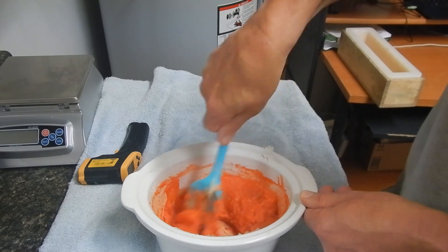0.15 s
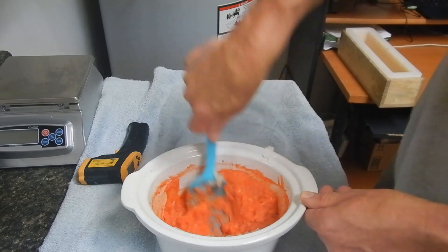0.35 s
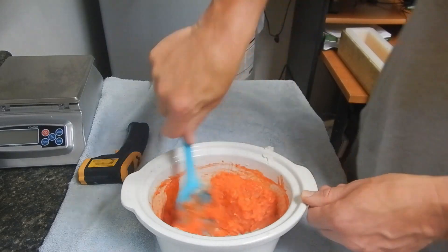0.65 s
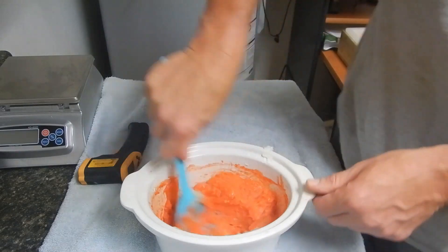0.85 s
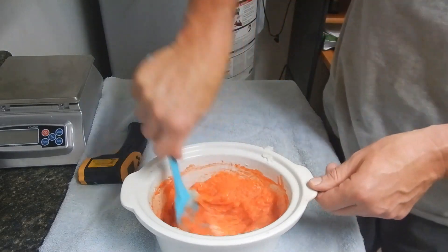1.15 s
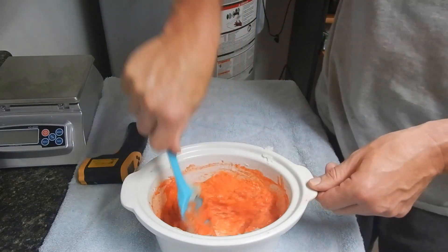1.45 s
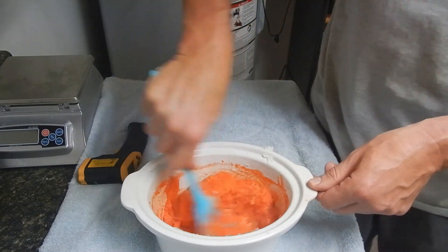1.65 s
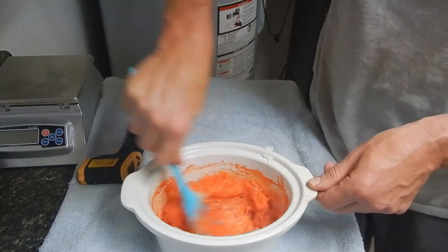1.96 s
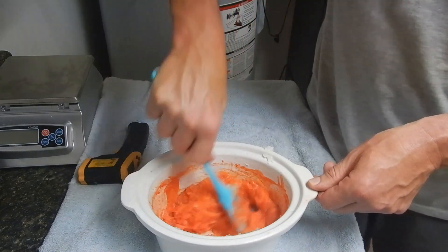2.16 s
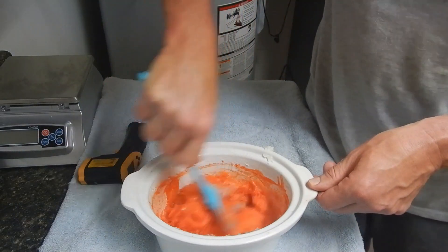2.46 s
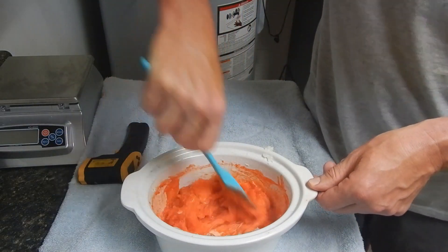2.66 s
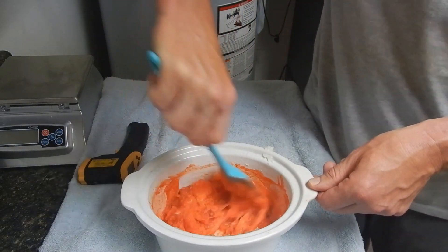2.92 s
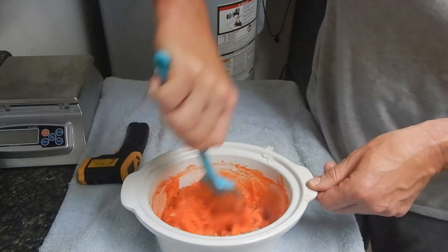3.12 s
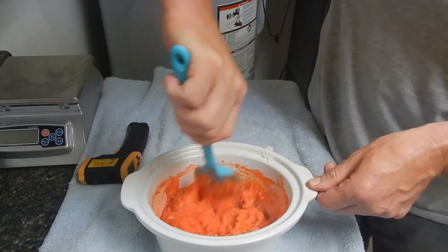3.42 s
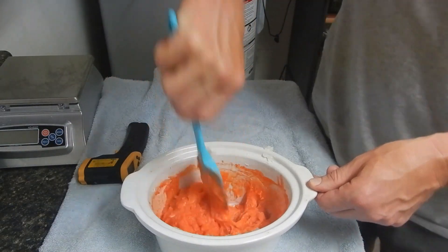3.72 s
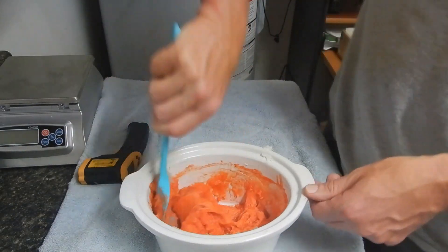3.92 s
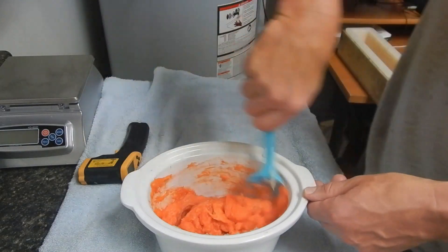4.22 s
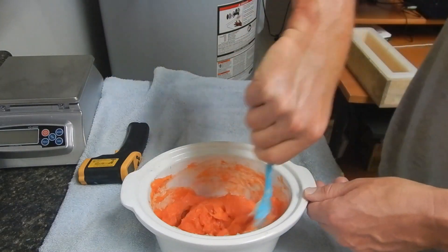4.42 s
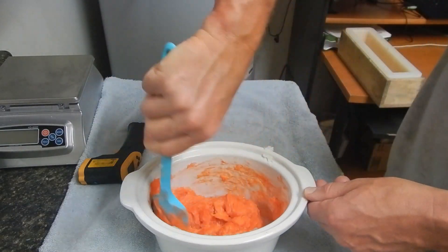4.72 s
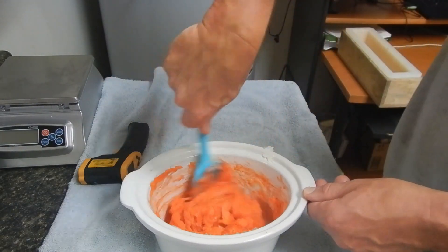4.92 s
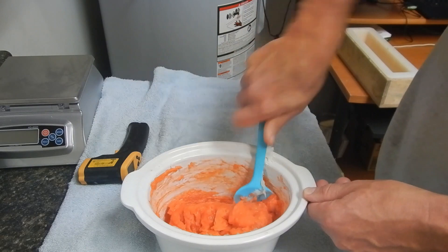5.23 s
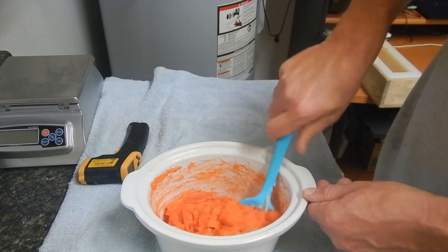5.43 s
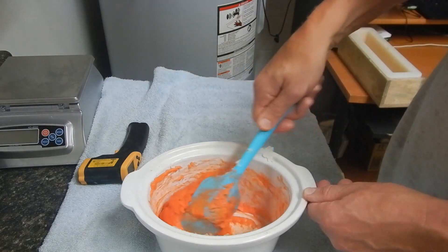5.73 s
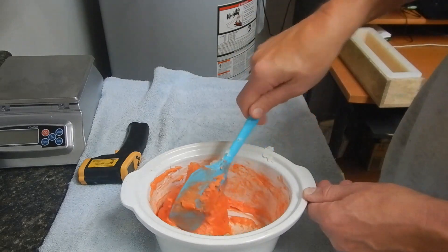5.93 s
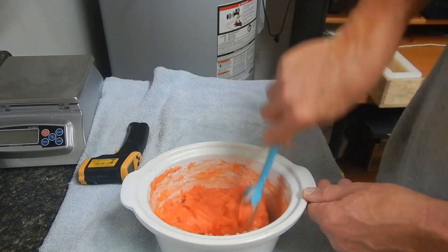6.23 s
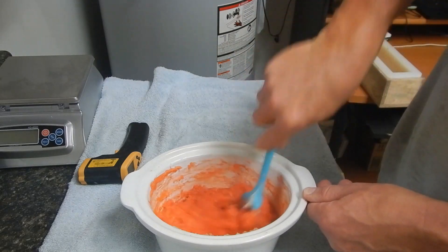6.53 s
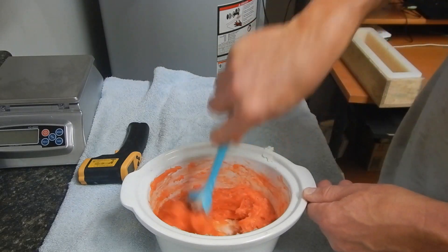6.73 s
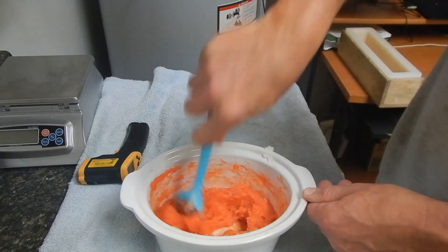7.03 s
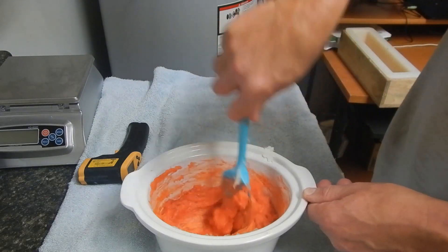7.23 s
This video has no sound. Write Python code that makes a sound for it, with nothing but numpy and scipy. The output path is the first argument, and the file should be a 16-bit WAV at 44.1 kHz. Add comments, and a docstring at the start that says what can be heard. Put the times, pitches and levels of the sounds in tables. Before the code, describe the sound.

A soft spatula works stiff, sticky batter in a ceramic pot, close up in a small, fairly dry workroom. Irregular wet ticks, sucking squelches and fine crackles follow each fold. Pops grow densest and loudest in the middle, with one sharp snap later, then a brief lull and sparser clicks. Dull pot knocks and low padded bench thumps sit beneath, over a faint steady machine hiss.

```python
"""A silicone spatula folds thick batter in a ceramic pot on a towel-covered bench.
Air pockets pop as the batter lets go: a tick, a damped pocket tone and a spray of filtered noise.
The blade squelches in clumps of tiny damped grains, and knocks on the wall excite the pot's modes.
The pot rocks and thumps the bench, whose low modes boom over a rumble of low-passed noise.
Short echoes and a decaying tail give the room, where a machine hisses steadily as shaped noise."""
import sys
import numpy as np
from scipy import signal
from scipy.io import wavfile
from scipy.ndimage import uniform_filter1d

SR = 44100
rng = np.random.default_rng(int(sys.argv[2]) if len(sys.argv) > 2 else 0)


def inscribe(sig):
    """Save sig as 16-bit PCM at rate SR to the path in sys.argv[1].

    A 1-D sig is mono; a 2-D sig holds one channel per row.
    Samples are clipped to [-1, 1] before scaling.
    """
    pcm = np.round(np.clip(np.atleast_2d(sig).T, -1, 1) * 32767)
    wavfile.write(sys.argv[1], SR, pcm.astype(np.int16))


N = 325017  # samples


def gain_of(db):
    """The decibel law: amplitude gain of a level."""
    return 10 ** (np.asarray(db) / 20)


def evened(x):
    """Normalisation of mean power: scales to rms 1."""
    return x / np.sqrt(np.mean(x ** 2) + 1e-30)


def smoothed(x, size):
    """Low-pass by two moving averages in turn, scaled to rms 1."""
    return evened(uniform_filter1d(uniform_filter1d(x, size=size), size=size))


def read(points, hz):
    """Interpolation of a spectrum along a log-frequency axis."""
    point_hz, value = np.transpose(points)
    return np.interp(np.log(hz + 1), np.log(point_hz + 1), value)


def hump(hz, centre_hz, width_hz):
    """Resonance curve that falls off as the square of the detuning."""
    return 1 / (1 + (2 * (hz - centre_hz) / width_hz) ** 2)


def causal(gain):
    """Minimum phase: the most compact causal pulse with this gain, from the Hilbert transform of its log."""
    both_halves = np.r_[gain, gain[-2:0:-1]]
    log_gain = np.log(np.maximum(both_halves, 1e-6))
    return np.fft.ifft(np.exp(np.conj(signal.hilbert(log_gain)))).real


def resonate(x, hz, width_hz):
    """One-pole complex resonator: its decay rate sets its bandwidth."""
    r = np.exp(-np.pi * width_hz / SR)
    return 2 * signal.lfilter([1 - r], [1, -r * np.exp(2j * np.pi * hz / SR)], x).real


def ringing(modes, size):
    """Modal superposition: the impulse response is a sum of damped sines."""
    t = np.arange(size) / SR
    return sum(gain_of(db) * np.exp(-np.pi * width_hz * t) * np.sin(2 * np.pi * hz * t)
               for hz, width_hz, db in modes)


def panned(pan_db):
    """Level-difference stereo: left over right by pan_db."""
    return gain_of(np.array([[.5], [-.5]]) * pan_db)


def add(mix, s, sound):
    """Linear superposition of a stereo sound from s seconds on."""
    part = mix[:, max(round(s * SR), 0):][:, :sound.shape[1]]
    part += sound[:, :part.shape[1]]


def air_pulse():
    """Spectral shaping of turbulence: a unit-energy filter that turns white noise into airy spray."""
    # spectrum of escaping air: hz, relative_level_db
    air_spectrum = [(3000, -21.5), (6000, 13), (8000, 5.5), (10000, -5), (14000, -6.5), (16000, -28.5)]
    hz = np.fft.rfftfreq(1024, 1 / SR)
    pulse = causal(gain_of(read(air_spectrum, hz)))[:128]
    return pulse / np.linalg.norm(pulse)


def slips(count, share):
    """Stick-slip release: rows of sparse slips of random size."""
    return rng.standard_normal((count, 2048)) * (rng.random((count, 2048)) < share)


def burst(gain, tear_ms, lesser_slips, rise_ms):
    """Stick-slip excitation of a resonance: lesser slips gather, one strong slip, then they thin out; peak 1."""
    t_ms = np.arange(len(lesser_slips)) / SR * 1000 - rise_ms
    tear_ms = np.clip(tear_ms, .3, 25)
    gather = np.exp(np.minimum(t_ms, 0) / 1.64)
    thin_out = np.exp(-np.maximum(t_ms, 0) / tear_ms)
    train = lesser_slips * gather * thin_out * np.tanh(tear_ms / 0.8)
    strong_slip = np.arange(len(lesser_slips)) == round(rise_ms * SR / 1000)
    sound = signal.fftconvolve(train + strong_slip, causal(gain)[:512])
    return sound / abs(sound).max()


def pops():
    """Cavity resonance: a bursting pocket rings a few cycles under a sharp tick and sprays air."""
    # the larger air pockets that burst: time_s, peak_db, tick_hz, pocket_hz, pocket_re_tick_db,
    # tear_ms (tearing time, held within 0.3-25 ms)
    pockets = [(0.179, -36.5, 3000, 2030, 6, 5.7), (0.2533, -30, 3380, 1290, 2.5, 3.5),
               (0.279, -35.5, 3240, 2160, -17, 1.8), (0.407, -36, 4500, 1980, -6, 5.3),
               (0.417, -26, 3180, 2080, 0, 0.6), (0.452, -35.5, 4500, 1130, -18, 1.6),
               (0.629, -34, 3750, 1700, 4, 0.87), (0.869, -36.5, 4580, 1270, 8, 1.9),
               (1.263, -42, 4570, 1710, -10, 1.2), (1.346, -39, 3580, 1900, 25, 0.76),
               (1.4122, -50, 4560, 1670, -14, 0.91), (1.473, -39.5, 4430, 1900, 16, 0.56),
               (1.9943, -27.5, 4050, 1660, 13, 0.44), (2.0059, -23, 3540, 1770, 10.5, 2.3),
               (2.056, -36.5, 3000, 1500, 12, 1), (2.107, -36, 4430, 2090, -17, 7.4),
               (2.262, -45, 4650, 2080, -12, 1.5), (2.2704, -34, 3920, 2080, -7, 1.8),
               (2.397, -41, 4540, 2100, -8, 1.7), (2.5227, -26.5, 3400, 1700, 9.5, 3.4),
               (2.608, -43, 4240, 1780, -9, 1.8), (2.6292, -26, 3070, 2480, 9, 2.6),
               (2.798, -38, 3600, 2080, -15, 1), (2.808, -15, 4100, 2080, 13, 1.9),
               (2.8703, -35.5, 4950, 2110, -10, 9.1), (2.896, -33.5, 4670, 2160, 1, 1.8),
               (3.088, -27.5, 3120, 1860, 13, 1.9), (3.1061, -27.5, 2670, 2080, 12, 0.96),
               (3.127, -34, 4200, 2400, 0, 0.66), (3.1737, -31.5, 4580, 1730, -17, 0.42),
               (3.3373, -13, 4540, 1580, 11, 2.6), (3.367, -31, 3230, 1490, 7, 2.3),
               (3.3897, -27.5, 4100, 1510, -8, 2.1), (3.4074, -34, 3830, 2050, 14, 5),
               (3.428, -31.5, 4470, 1930, -2, 3.2), (3.6456, -24, 3000, 1940, -18, 1.9),
               (3.69, -18.5, 4370, 1490, 12, 1.6), (4.072, -30, 3280, 2150, -4, 2.3),
               (4.186, -35, 3100, 1680, -17, 2.2), (4.2521, -27, 4430, 1700, -1, 7.2),
               (4.294, -35.5, 3000, 1660, 23, 3.7), (4.388, -40, 4250, 1560, 24, 27),
               (4.596, -41.5, 4830, 1960, -2, 2.2), (4.6848, -39.5, 4500, 2100, -4, 1.7),
               (4.7084, -30.5, 4500, 1990, -5, 1.5), (4.7257, -32.5, 4540, 2080, 8, 2.3),
               (4.739, -39, 4500, 2000, -14, 2.7), (4.778, -35, 4600, 1950, 7.5, 2.1),
               (4.862, -33, 4280, 1680, 1, 0.81), (4.959, -40, 4660, 1760, -2, 2.1),
               (5.0344, -36, 2700, 1710, 22, 1.7), (5.063, -37, 4660, 1600, 4, 2.6),
               (5.082, -38, 4400, 2100, -16, 1), (5.0988, -33.5, 4600, 1770, -21, 1.8),
               (5.117, -36.5, 4450, 1750, -12, 4.2), (5.2763, -32, 4580, 1940, 13, 1.1),
               (5.299, -38, 4470, 2160, -13, 0.7), (5.32, -8, 3520, 2390, -41, 1.06),
               (5.384, -30, 3640, 1790, -21, 1.6), (5.437, -38, 4400, 1900, 14, 1.4),
               (5.55, -37, 4200, 1300, 10, 1.5), (5.5573, -35, 4030, 1330, -1, 4),
               (5.653, -34, 3000, 1240, 6, 1.4), (5.6851, -35.5, 4960, 1110, 10, 8),
               (6.372, -39, 4430, 2090, 13, 5.4), (6.3908, -27, 4200, 1300, -1, 1.85),
               (6.6522, -41.5, 2800, 2130, -18, 1), (6.6971, -32, 4500, 2090, 11, 3.7),
               (6.9732, -37.5, 4600, 1990, -15, 1), (7.0636, -34.5, 4500, 1830, -15, 1),
               (7.047, -33, 4500, 2050, -18, 0.62), (7.3108, -36, 4480, 2140, -10, 0.49),
               (7.3275, -34, 4500, 1800, -20, 0.47)]
    # spray re the pop's peak at the pivot pitch and level: small (high) pockets spray more,
    # loud ones less in proportion
    pivot_hz, pivot_db = 4400, -36
    spray_db, spray_db_per_octave, spray_db_per_db = -30, 23, -0.19
    out, hz = np.zeros((2, N)), np.fft.rfftfreq(1024, 1 / SR)
    # torn batter makes every spectrum ragged
    ragged = evened(uniform_filter1d(rng.standard_normal((len(pockets), len(hz))), size=11, axis=1))
    tears = slips(len(pockets), .03)
    t_ms = np.arange(2048) / SR * 1000
    noise = rng.standard_normal((len(pockets), 2, 2048))
    sprays = signal.fftconvolve(noise, air_pulse()[None, None], axes=2)[..., :2048]
    for pocket, rag, tear, spray in zip(pockets, ragged, tears, sprays):
        s, db, tick_hz, pocket_hz, pocket_db, tear_ms = pocket
        gain = hump(hz, tick_hz, .45 * tick_hz)
        gain = gain + gain_of(1.5) * hump(hz, 4456, 430) + gain_of(-20.5) * hump(hz, 1500, 2200)
        gain = gain + gain_of(pocket_db) * hump(hz, pocket_hz, 0.43 * pocket_hz)
        low_pass = 1 / np.sqrt(1 + (hz / 5200) ** 16)
        high_pass = hz ** 2 / (hz ** 2 + 800 ** 2)
        gain = gain * gain_of(2 * rag) * low_pass * high_pass
        # big pockets (peak above -25 dB) burst in a cleaner snap
        clean = gain_of(-.6 * max(db + 25, 0))
        pop = burst(gain, tear_ms, tear * clean, rise_ms=3.)
        add(out, s - .0015, gain_of(db) * pop * panned(-0.33))
        fade_ms = np.clip(tear_ms, .3, 25) + 1.8
        puff = (spray + 0.41 * spray[::-1]) * np.tanh(t_ms / 1.6) ** 2 * np.exp(-t_ms / fade_ms)
        air_db = spray_db + spray_db_per_octave * np.log2(tick_hz / pivot_hz)
        air_db = air_db + spray_db_per_db * (db - pivot_db)
        add(out, s - .001, gain_of(db + air_db) * puff * panned(-2.5))
    return out


def grains(pitches_hz, cycles, spread_db, count):
    """Granular superposition: tiny pockets of many pitches, each pitch a sparse train of uneven sizes; rms 1."""
    out = np.zeros(N + 2048)
    for hz, db in pitches_hz:
        cycle = np.arange(round(cycles * SR / hz)) * hz / SR
        grain = np.sin(2 * np.pi * cycle) * cycle ** 2 * np.exp(-9.5 * cycle / cycles)
        at = rng.integers(0, N, count)
        size = gain_of(db + spread_db * np.minimum(rng.exponential(1, count), 3.2))
        np.add.at(out, at[:, None] + np.arange(len(cycle)), size[:, None] * grain)
    return evened(out[:N])


def folding(pulls_s, peaks_db, swells_s, fades_s, depth_db):
    """Power addition of all folds, each a straight swell and fade in dB; gives the level in dB."""
    t, power = np.arange(0, N, 32) / SR, 0
    for s, db, swell_s, fade_s in zip(pulls_s, peaks_db, swells_s, fades_s):
        away = np.maximum((s - t) / max(swell_s, .01), (t - s) / max(fade_s, .01))
        power = power + gain_of(db - depth_db * away) ** 2
    return np.interp(np.arange(N) / SR, t, 10 * np.log10(power + 1e-12))


def stroke():
    """Adhesion and suction: sticky crackle, lower sucking pockets and a wide fizz follow the blade in clumps."""
    # each fold of the blade swells to its pull and dies away: pull_s, squelch_db, suction_db,
    # swell_s, fade_s (the times, at least 0.01 s, in which the squelch changes by depth_db)
    folds = [(0.02, -58, -56, 0.21, 0.057), (0.15, -63, -62, 0.15, 0.17), (0.26, -52, -66, 0.019, 0.029),
             (0.41, -53.5, -53, 0.038, 0.076), (0.57, -55.5, -70, 0.07, 0.08),
             (0.66, -56.5, -59, 0.03, 0.21), (0.89, -61.5, -57.5, 0.067, 0.35),
             (1.3, -60, -63, 0.17, 0.051), (1.502, -60.5, -56, 0.04, 0.17), (1.82, -66.5, -66, 0.21, 0.25),
             (2.01, -64, -61, 0.028, 0.48), (2.28, -51.5, -53, .045, 0.052), (2.44, -60.5, -79, 0.12, 0.11),
             (2.63, -58, -69, 0.11, 0.13), (2.82, -63.5, -60, 0.12, 0.44), (3.1, -55, -47.5, 0.053, 0.2),
             (3.35, -58.5, -51.5, 0.016, 0.35), (3.552, -58.5, -70, 0.034, 0.063),
             (3.699, -52.5, -47, 0.073, 0.08), (4.17, -55.5, -63, 0.12, 0.18),
             (4.26, -57, -54.5, 0.13, 0.33), (4.401, -63, -50.5, 0.04, 0.073),
             (4.73, -59, -67, 0.13, 0.059), (4.87, -62, -67, 0.2, 0.26), (5.04, -60, -61.5, 0.024, 0.11),
             (5.11, -57.5, -66, 0.11, 0.15), (5.33, -52.5, -73, 0.068, 0.13),
             (5.559, -56, -52, 0.013, 0.025), (5.687, -60, -56, 0.085, 0.13),
             (6.4, -65.5, -65.5, 0.36, 0.095), (6.702, -59.5, -52.5, 0.1, 0.076),
             (7.06, -59.5, -61, 0.39, 0.037), (7.32, -61, -60, 0.22, 0.071)]
    # spectrum of the sticky crackle: hz, relative_level_db
    crackle_spectrum = [(2400, -13), (3100, 1), (3700, -6), (4500, 10.5), (5300, -12.5)]
    depth_db = 15
    suction_steeper = 1.83  # suction comes and goes faster than squelch
    pulls_s, squelch_peaks_db, suction_peaks_db, swells_s, fades_s = np.transpose(folds)
    squelch_db = folding(pulls_s, squelch_peaks_db, swells_s, fades_s, depth_db)
    suction_db = folding(pulls_s, suction_peaks_db, swells_s, fades_s, suction_steeper * depth_db)
    clumps = smoothed(rng.standard_normal(N), size=400)

    crackle_pitches = [(f, read(crackle_spectrum, f)) for f in np.geomspace(2400, 5300, 12)]
    suction_pitches = [(f, 8.9 * np.log2(f / 1500)) for f in np.geomspace(700, 2300, 9)]
    tick_pitches = [(f, read(crackle_spectrum, f)) for f in np.geomspace(2600, 5000, 8)]
    crackle = grains(crackle_pitches, 16.6, spread_db=6.0, count=1800)
    suction = grains(suction_pitches, 6.0, spread_db=4.0, count=600)
    ticks = grains(tick_pitches, 6.5, spread_db=4.5, count=400)
    wet = gain_of(squelch_db) * (crackle + gain_of(-6.5) * ticks) + gain_of(suction_db) * suction

    # each tick spits air
    spray = rng.standard_normal((2, N)) * (0.71 + 0.68 * uniform_filter1d(abs(ticks), size=40))
    fizz = evened(signal.oaconvolve(spray, air_pulse()[None], axes=1)[:, :N])
    # the colour of the fizz drifts: its part above 9 kHz comes and goes on its own
    high_pass = signal.firwin(63, 9000, fs=SR, pass_zero=False)
    upper = signal.oaconvolve(fizz, high_pass[None], "same")
    drift = smoothed(rng.standard_normal(N), size=700)
    fizz = fizz - upper + gain_of(4.9 * drift - 1.5) * upper
    fizz = gain_of(squelch_db - 17.5 + 2.0 * clumps) * fizz
    return gain_of(2.5 * clumps) * (wet * panned(0.063) + fizz * panned(-1.7))


def knocks():
    """Impact excitation: dull, short blows on the pot wall; returns them and the part that rings the pot."""
    # blade and batter knock the pot wall: time_s, peak_db, knock_hz, tear_ms (held within 0.3-25 ms),
    # hardness_db (hard blows ring the pot and rasp)
    blows = [(0.45, -36, 1090, 1.7, -0.5), (0.628, -40.5, 530, 26, -6), (0.88, -43, 724, 3.2, -7),
             (1.48, -40.5, 665, 2.3, -25), (2.004, -34, 830, 11, -14), (2.289, -41, 850, 2.5, -2),
             (2.534, -33.5, 597, 4, -3.5), (2.611, -40.5, 970, 1.3, 4.5), (2.806, -36, 800, 5.7, -6),
             (3.432, -39, 596, 2.3, -1), (3.655, -28.5, 1000, 2.2, -11), (3.678, -40.5, 800, 2, 3),
             (3.688, -33, 860, 4, 9), (4.26, -49, 770, 3, 4), (4.724, -44, 1000, 2.8, -11),
             (5.319, -60, 1280, 1.9, -8), (6.291, -44, 940, 2, -18), (6.39, -38, 920, 22, -16),
             (6.695, -36.5, 330, 3, -16), (6.877, -42.5, 316, 1.5, -13)]
    rasp_db, rasp_fade_ms = -35.5, 9.5  # airy rasp re a blow's peak plus hardness, and its slower fade
    out, drive = np.zeros((2, N)), np.zeros((2, N))
    hz, t_ms = np.fft.rfftfreq(1024, 1 / SR), np.arange(4096) / SR * 1000
    tears = 0.6 * slips(len(blows), 0.035)
    noise = rng.standard_normal((len(blows), 2, len(t_ms)))
    rasps = signal.fftconvolve(noise, air_pulse()[None, None], axes=2)[..., :len(t_ms)]
    rasp_rise = np.tanh(np.maximum(t_ms - 1.2, 0) / 1.4)
    rasps = rasps * rasp_rise * (np.exp(-t_ms / rasp_fade_ms) + 5.7 * np.exp(-t_ms / 3.1))
    for (s, db, knock_hz, tear_ms, hard_db), tear, rasp in zip(blows, tears, rasps):
        gain = hump(hz, knock_hz, 0.81 * knock_hz) + gain_of(-11.0) * hump(hz, 830, 1200)
        gain = gain * hz ** 2 / (hz ** 2 + (0.46 * knock_hz) ** 2)  # high-pass
        blow = gain_of(db) * burst(gain, tear_ms, tear, rise_ms=2.666) * panned(-.6)
        add(out, s, blow)
        add(out, s, gain_of(db + rasp_db + hard_db) * (rasp + 0.34 * rasp[::-1]) * panned(-2.5))
        add(drive, s, gain_of(hard_db) * blow)
    return out, drive


def pot_ring(batter, hard_blows):
    """Modal response: batter sounds and hard blows drive the damped modes of the ceramic pot."""
    # modes of the pot: hz, width_hz, relative_level_db
    pot_modes = [(406, 14, 5), (770, 9.9, -3.5), (798.4, 9, 2.5), (974, 12, 0), (1400, 35, 9),
                 (1490, 12, -6), (2080, 22, 0), (3520, 430, 19)]
    batter_drive_db, knock_drive_db = -51, -51.5
    drive = gain_of(batter_drive_db) * batter + gain_of(knock_drive_db) * hard_blows
    return signal.oaconvolve(drive, ringing(pot_modes, size=6000)[None], axes=1)[:, :N]


def thumps():
    """Forced vibration: a blow and uneven rocking drive the lowest bench mode, upper modes and a slower sway."""
    # the pot rocks and thumps the bench: time_s, boom_peak_db, sway_re_boom_db, rattle_re_boom_db,
    # rock_s (the rocking lasts 1.31 times this, held within 0.01-0.18 s)
    rocks = [(0.122, -51, 1, -15, 0.077), (0.397, -44.5, 7, -14, 0.037), (0.45, -43, -2, -23, 0.058),
             (0.625, -53, 5, -6, 0.067), (0.918, -45, -16, -22, 0.05), (1.089, -58, -10, -12, 0.032),
             (1.223, -46, -16, -20, 0.036), (1.465, -51, -11, 0, 0.076), (1.588, -49, -20, 4.5, 0.066),
             (1.757, -44.5, 9.5, -7, 0.075), (1.993, -51, 6, -7, 0.12), (2.31, -42, 2.5, -22, 0.061),
             (2.56, -47.5, 5, -7, 0.1), (2.83, -46.5, 2, -12, 0.035), (3.113, -49.5, 3, -14, 0.089),
             (3.432, -45, -4.5, -3, 0.049), (3.689, -39.5, 3.5, -6.5, 0.094),
             (4.282, -41.5, -2, -8.5, 0.069), (6.698, -37.5, -6, -10.5, 0.058),
             (6.897, -44.5, -5, -4, 0.071), (7.203, -36.5, 1.5, -14, 0.081)]
    # modes of the bench, lowest first: hz, width_hz, relative_level_db
    bench_modes = [(109.7, 38, 0), (164, 24, 0), (215, 36, -5), (300, 55, -11.5), (379, 20, -8.5)]
    sway_hz, sway_width_hz = 53.2, 25
    sway_lag_s = 0.0208  # the sway builds after the boom
    lean_db = 5.5  # left over right
    out, t = np.zeros((2, N)), np.arange(8192) / SR
    noises = rng.standard_normal((len(rocks), 3, len(t)))
    low, upper = ringing(bench_modes[:1], size=8192), ringing(bench_modes[1:], size=8192)
    swing = ringing([(sway_hz, sway_width_hz, 0)], size=8192) * np.tanh(t / 0.012)
    tone = np.cos(2 * np.pi * bench_modes[0][0] * t)
    for (s, db, sway_db, rattle_db, rock_s), (a, b, c) in zip(rocks, noises):
        rocking_s = np.clip(1.31 * rock_s, .01, .18)
        arch = np.sin(np.pi * np.minimum(t / rocking_s, 1) ** 0.46)
        push = arch + 2.1 * np.exp(-t / 0.0082)  # rocking plus the blow
        boom = signal.fftconvolve(push * (tone + 3.7 * b), low)
        # partly shared noise makes left and right differ
        rattle = signal.fftconvolve(push * np.array([a, a + 0.45 * c]), upper[None], axes=1)
        sway = signal.fftconvolve(push * np.array([b, 2.5 * b + 2.7 * c]), swing[None], axes=1)
        add(out, s - .003, gain_of(db) * boom / abs(boom).max() * panned(lean_db))
        add(out, s - .003, gain_of(db + rattle_db) * rattle / abs(rattle).max())
        add(out, s + sway_lag_s, gain_of(db + sway_db) * sway / abs(sway).max() * panned(lean_db))
    return out


def rumble():
    """Resonant filtering of noise: a lumpy rumble under the lowest bench mode."""
    # the bench shakes under the stirring: time_s, rms_level_db
    shaking = [(0, -63.5), (.5, -58.5), (2, -60), (3.6, -55), (4.4, -59.5), (5.2, -64.5), (6.4, -78),
               (6.8, -64), (7.37, -49)]
    a, b = rng.standard_normal((2, N))
    left_right = np.array([a, 0.17 * a + 0.95 * b])
    low = resonate(resonate(left_right, 28, 73), 28, 73)
    level_db = np.interp(np.arange(N) / SR, *np.transpose(shaking))
    return gain_of(level_db) * evened(low) * panned(1.7)


def room(x):
    """Image-like echoes, then a diffuse tail: sparse taps of random sign, each band dying at its own speed."""
    # reflections from the pot wall and the bench: delay_s, level_db
    near_echoes = [(.0028, -22), (.0054, -12)]
    # reverberation time: hz, t60_s
    decay_times = [(400, 0.77), (1500, 0.29), (4000, 0.13), (9000, 0.11)]
    tail_db = -9.5
    taps = np.zeros((2, SR // 2))
    # one tap at a random place in every 20 samples
    at = np.arange(100, SR // 2 - 20, 20) + rng.integers(0, 20, (2, (SR // 2 - 101) // 20))
    np.put_along_axis(taps, at, rng.choice([-1., 1.], at.shape), 1)
    taps = taps + 0.49 * taps[::-1]
    hz, t, z = signal.stft(taps, SR, nperseg=256)
    decay = gain_of(-60 * t / read(decay_times, hz)[:, None])
    tail = signal.istft(z * decay, SR, nperseg=256)[1]
    tail = gain_of(tail_db) * tail / np.linalg.norm(tail[0])
    tail[:, :100] = 0
    for s, db in near_echoes:
        tail[[0, 1], round(s * SR) + np.array([0, 3])] += gain_of(db)  # right 3 samples later
    return signal.oaconvolve(x, tail, axes=1)[:, :N]


def hiss():
    """Stationary shaped noise: random short-time spectra with drifting patches and partial coherence."""
    # spectrum of the machine's hiss: hz, relative_level_db
    hiss_spectrum = [(35, -52), (60, 0.5), (113, 0), (168, -5.5), (602, -13), (864, -14), (988, -9),
                     (1270, -13.5), (1720, -7.5), (2080, -4.5), (2510, -17), (3820, -23), (4530, -28),
                     (5700, -42), (7800, -47), (12500, -66.5)]
    # peaks on it: hz, width_hz, height_db
    hiss_peaks = [(1700, 50, 8.5), (2100, 140, 3), (4580, 200, 14.5)]
    # left-right likeness: hz, correlation (0 to 1)
    likeness = [(60, 0.52), (150, 0.41), (360, 0.41), (880, 0.69), (2150, 0.52), (5250, 0.028)]
    # left over right: hz, lean_db
    lean = [(60, 4.5), (150, 1), (360, 1.5), (880, -3.5), (2150, 5.5), (5250, 1)]
    rms_db = -54
    frames, hz = N // 256 + 5, np.fft.rfftfreq(1024, 1 / SR)
    a, b, c, d, patches = rng.standard_normal((frames, 513, 5)).T
    patches = uniform_filter1d(patches, size=10, axis=0)  # along frequency
    patches = evened(uniform_filter1d(patches, size=12, axis=1))  # along time
    same = np.clip(read(likeness, hz), -1, 1)[:, None]
    left = a + 1j * b
    right = same * left + np.sqrt(1 - same ** 2) * (c + 1j * d)
    shape_db = read(hiss_spectrum, hz) + sum(db * hump(hz, f, w) for f, w, db in hiss_peaks)
    level = gain_of(shape_db[:, None] + 1.4 * patches)
    z = np.array([left, right]) * level * panned(read(lean, hz))[..., None]
    return gain_of(rms_db) * evened(signal.istft(z, nperseg=1024, noverlap=768)[1][:, :N])


def scene():
    """Superposition: batter sounds ring the pot and fill the room, over bench thumps, rumble and hiss."""
    batter = pops() + stroke()
    blows, hard_blows = knocks()
    # the batter's treble leans right
    batter = batter + 0.15 * np.array([[-1], [1]]) * resonate(batter, 4400, 1500)
    pot = pot_ring(batter, hard_blows)
    return batter + blows + pot + room(batter + blows) + thumps() + rumble() + hiss()


def record(dry):
    """Band limitation: a linear-phase low-pass."""
    edge_hz = 15600
    low_pass = signal.firwin(511, edge_hz, window=("kaiser", 9), fs=SR)
    return signal.oaconvolve(dry, low_pass[None], "same")


dry = scene()
out = record(dry)
inscribe(out)
```